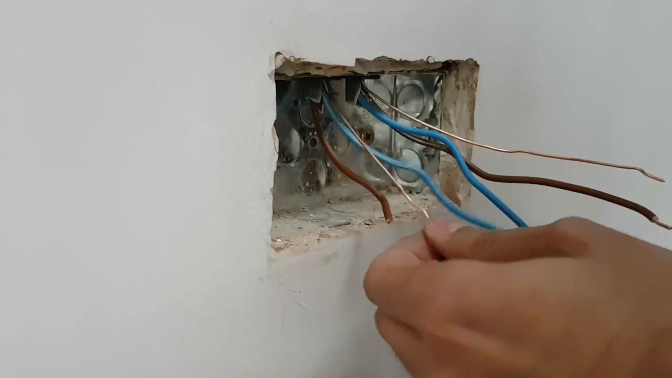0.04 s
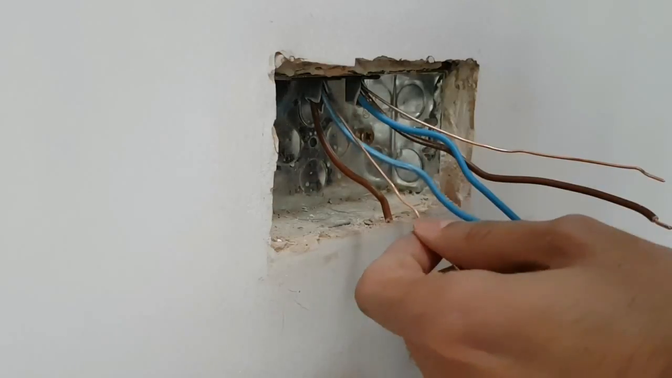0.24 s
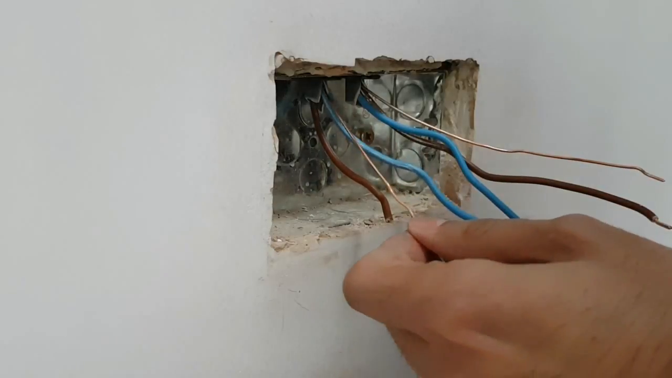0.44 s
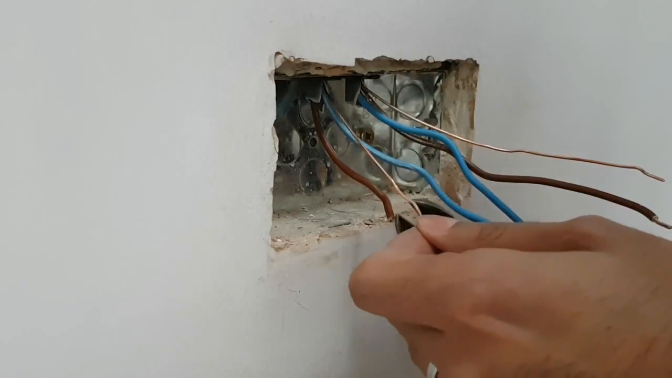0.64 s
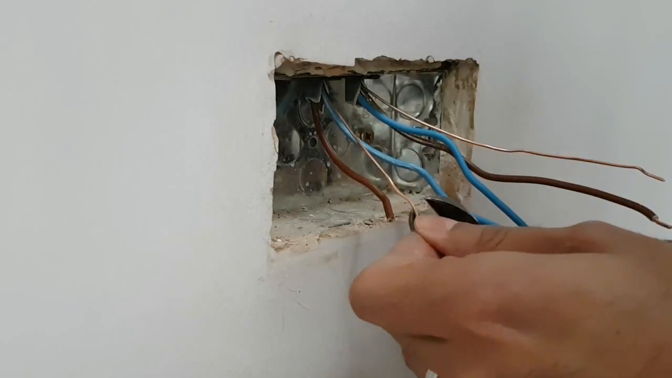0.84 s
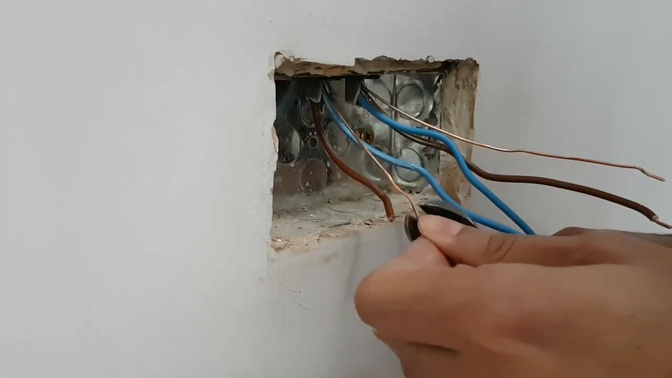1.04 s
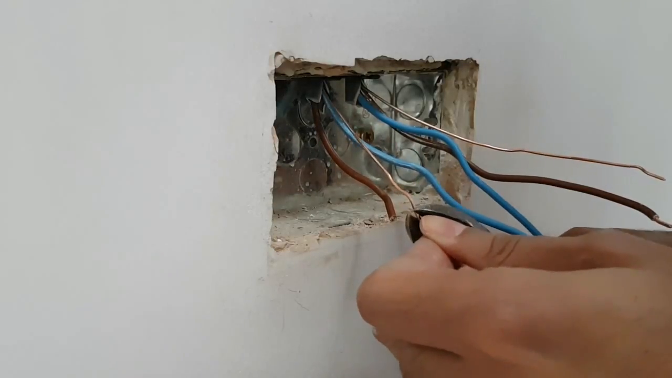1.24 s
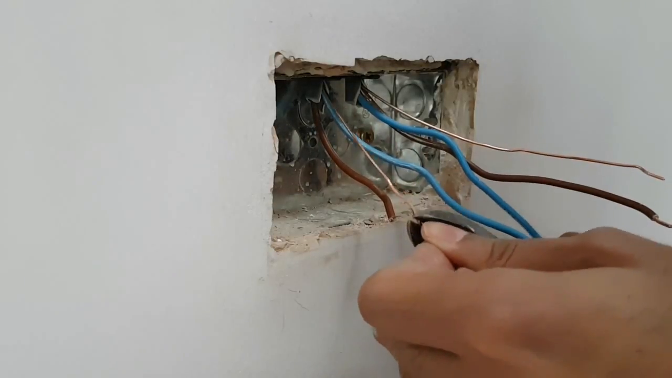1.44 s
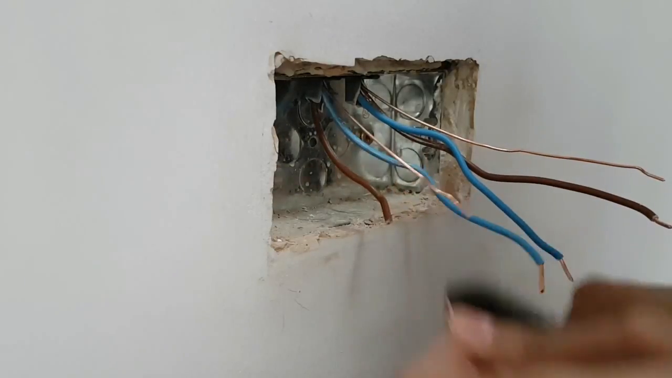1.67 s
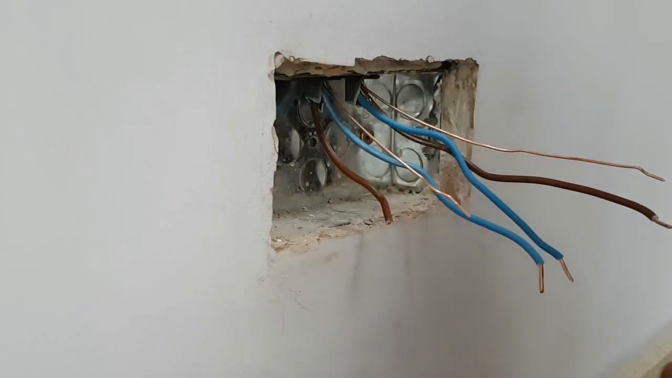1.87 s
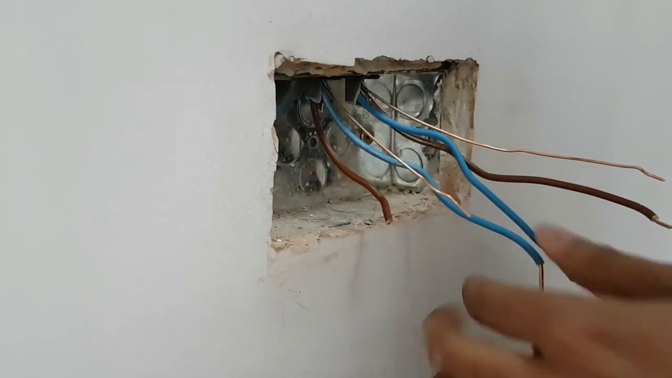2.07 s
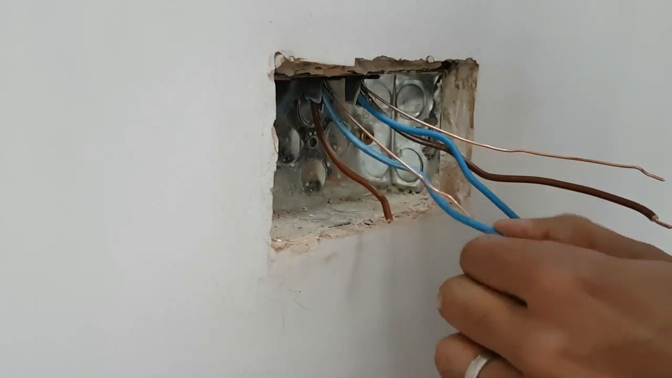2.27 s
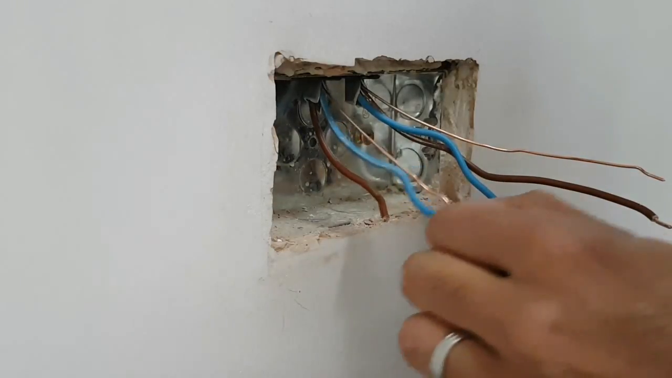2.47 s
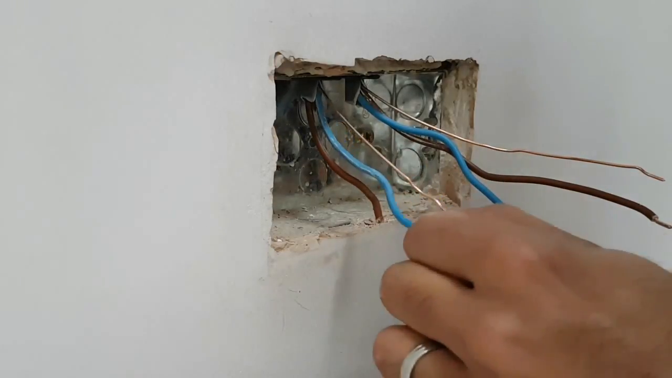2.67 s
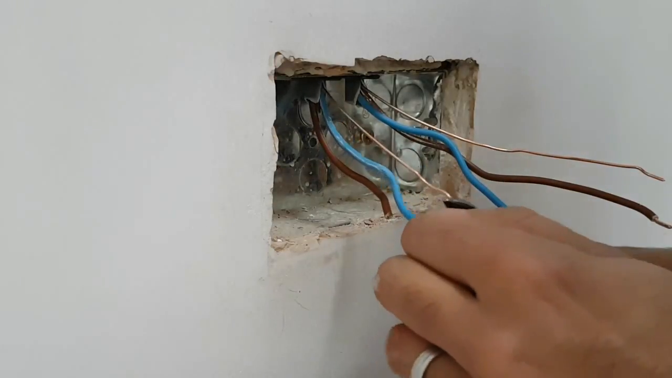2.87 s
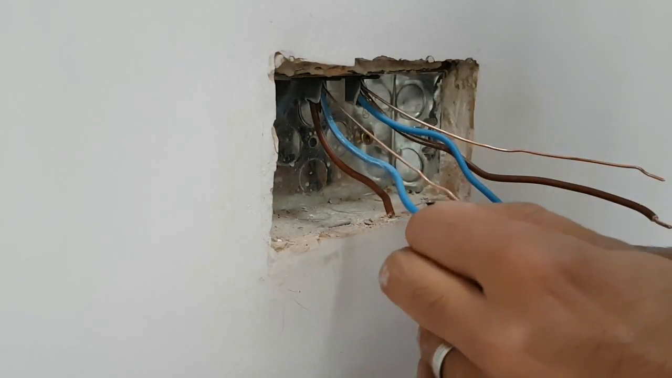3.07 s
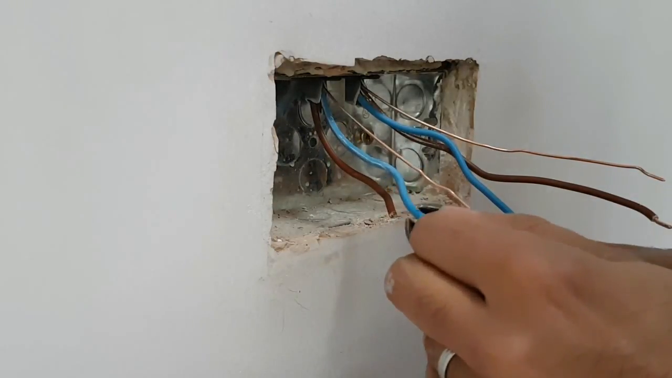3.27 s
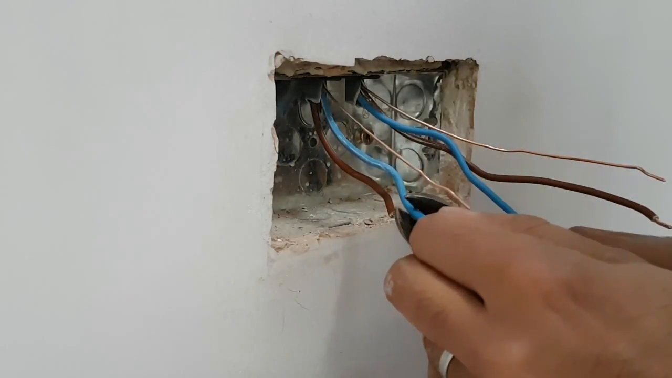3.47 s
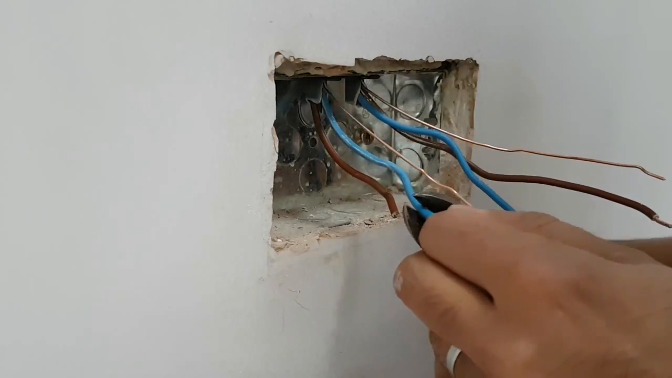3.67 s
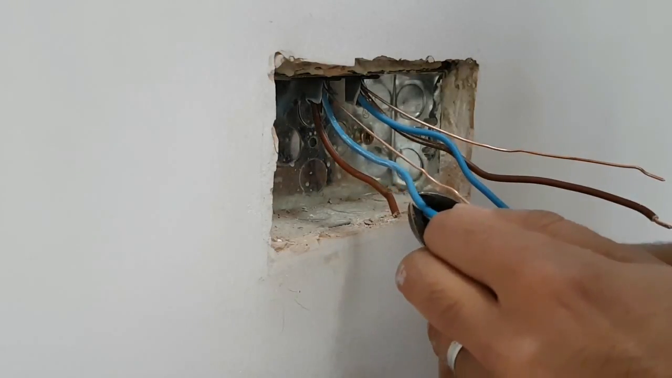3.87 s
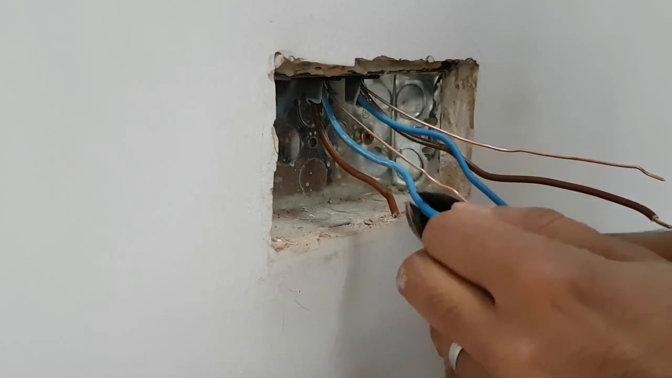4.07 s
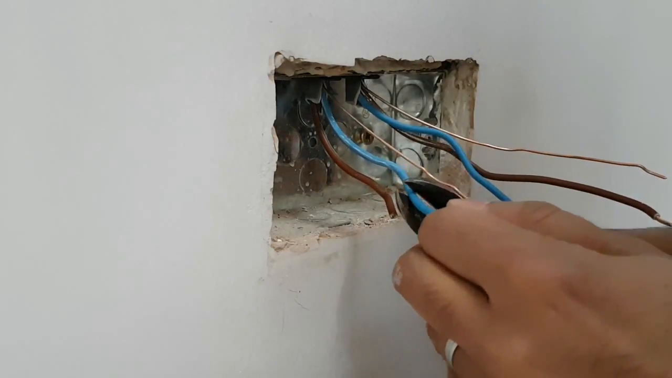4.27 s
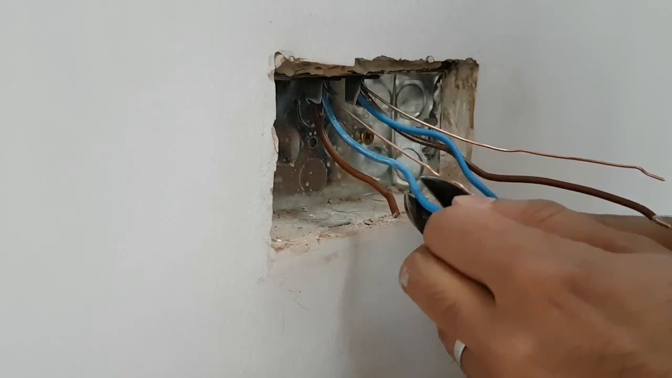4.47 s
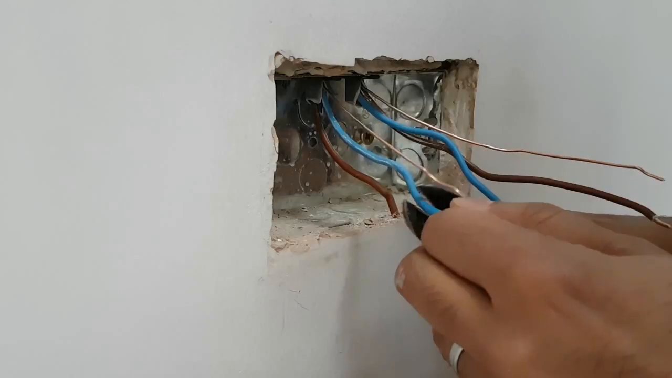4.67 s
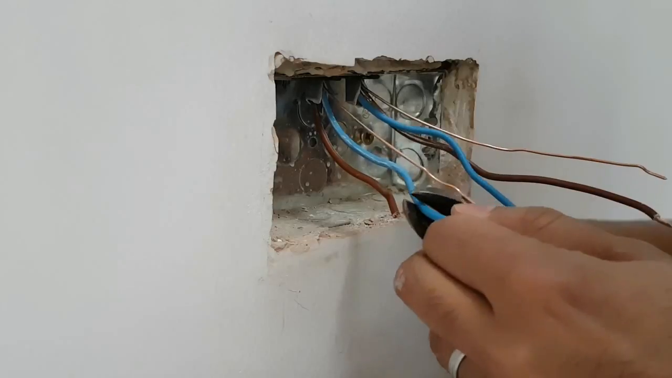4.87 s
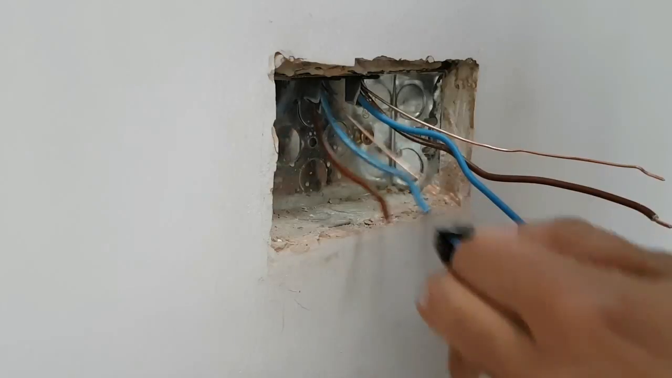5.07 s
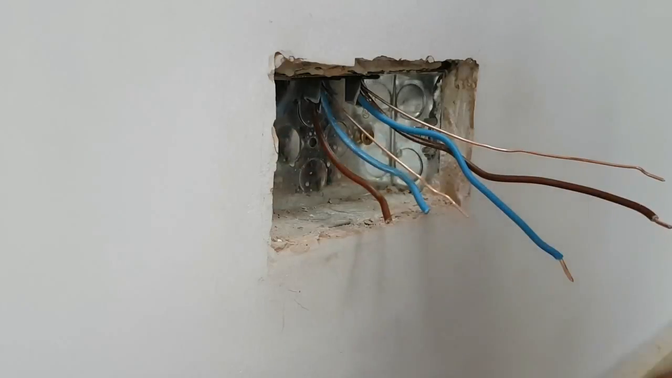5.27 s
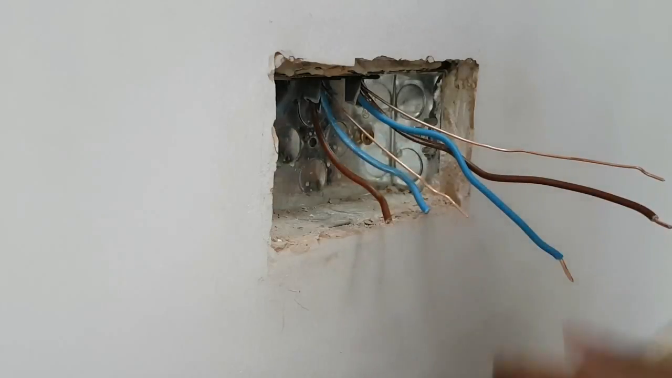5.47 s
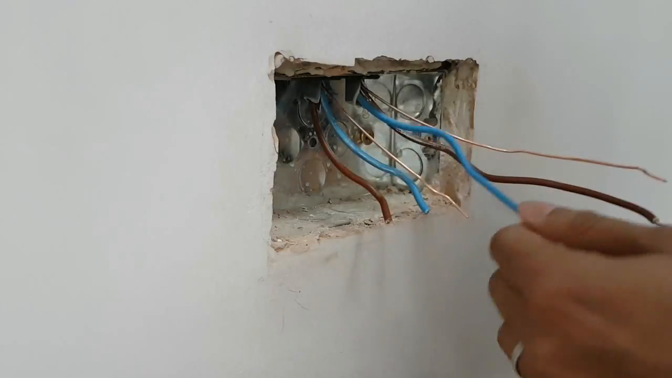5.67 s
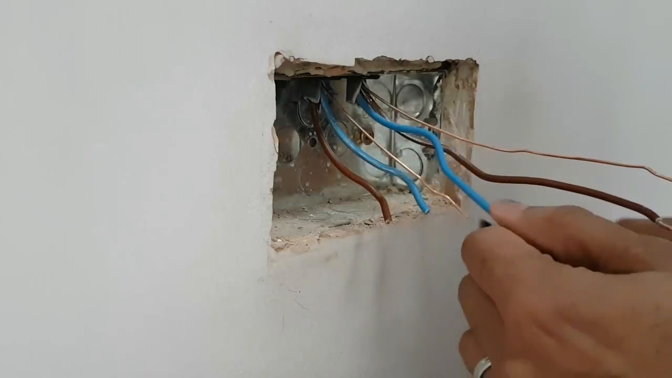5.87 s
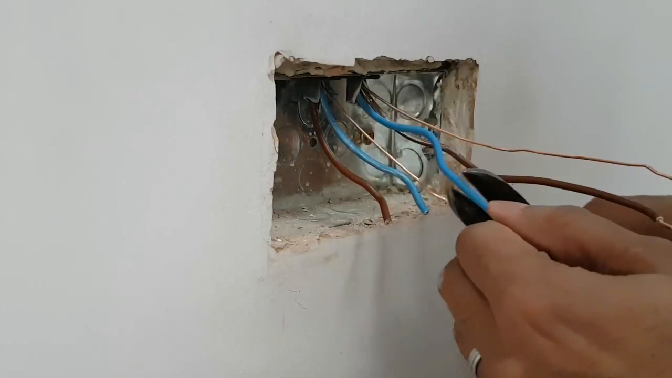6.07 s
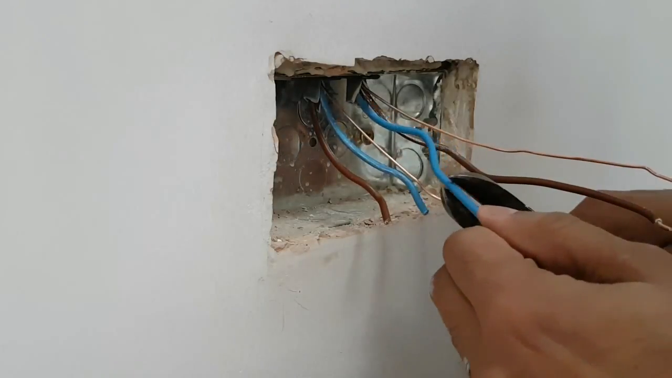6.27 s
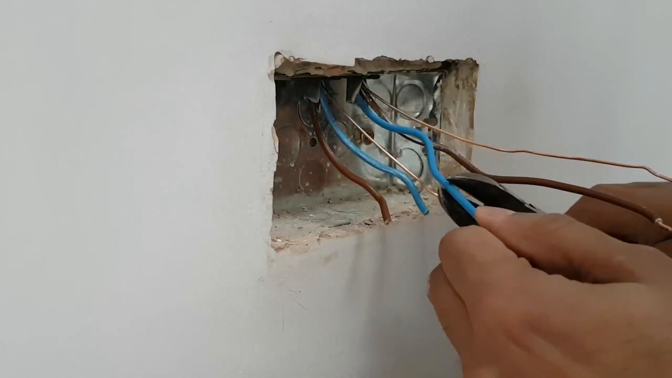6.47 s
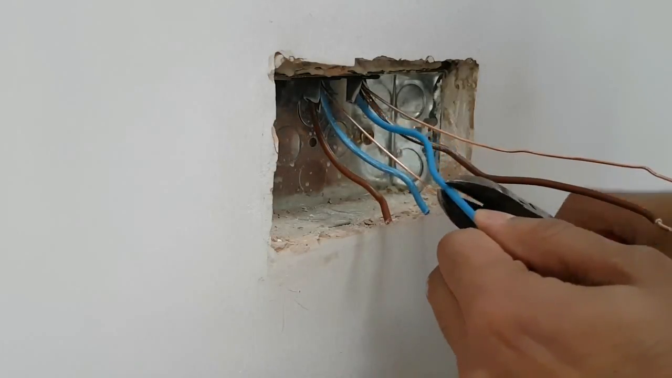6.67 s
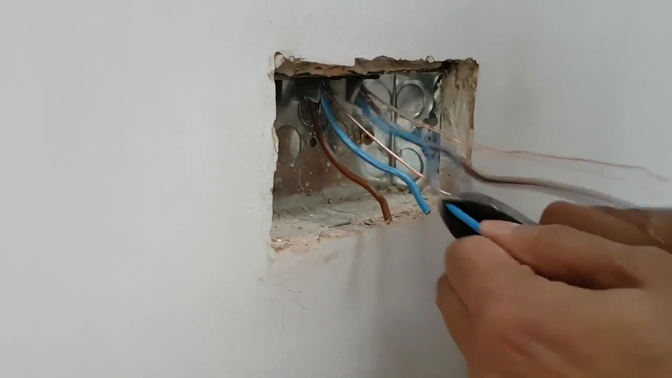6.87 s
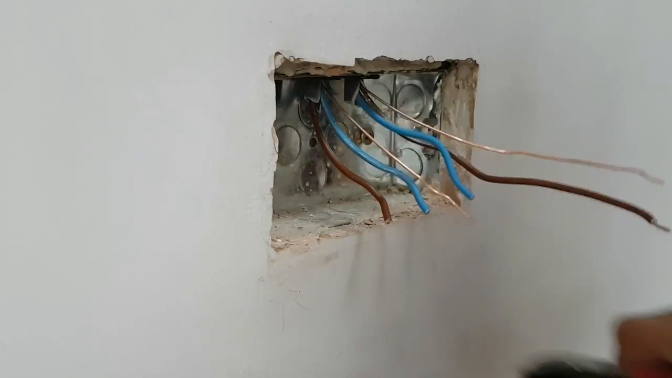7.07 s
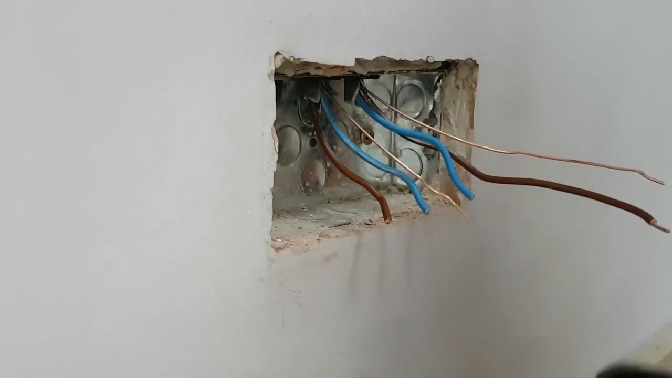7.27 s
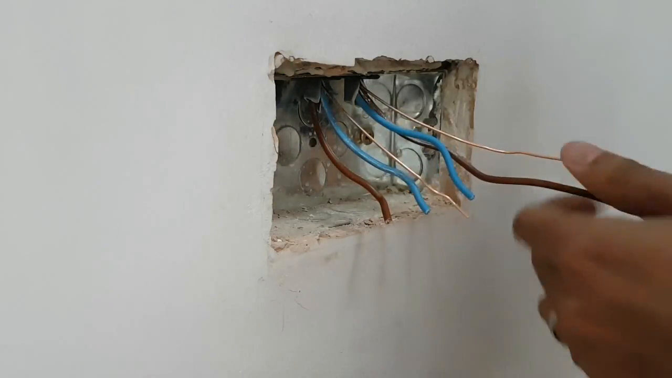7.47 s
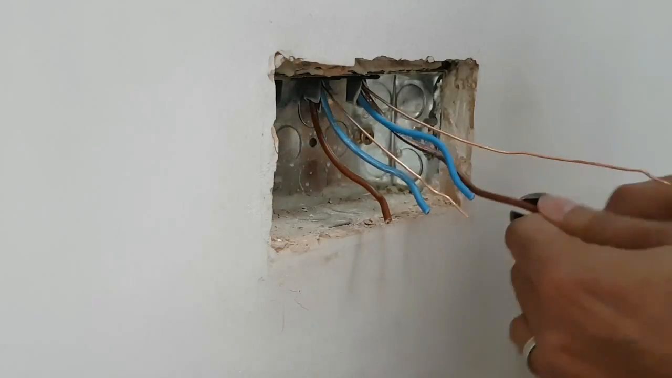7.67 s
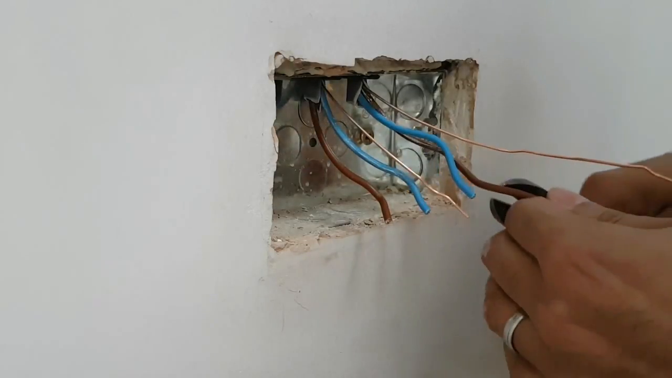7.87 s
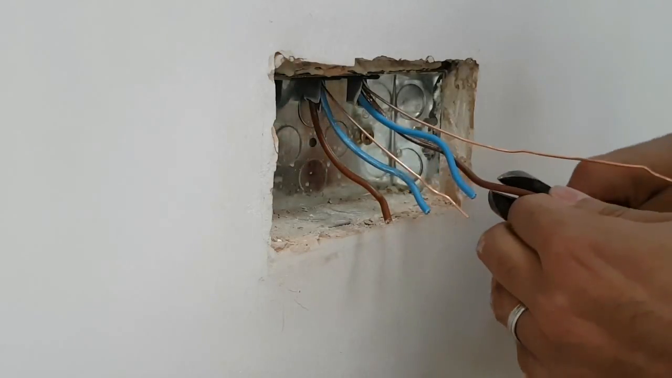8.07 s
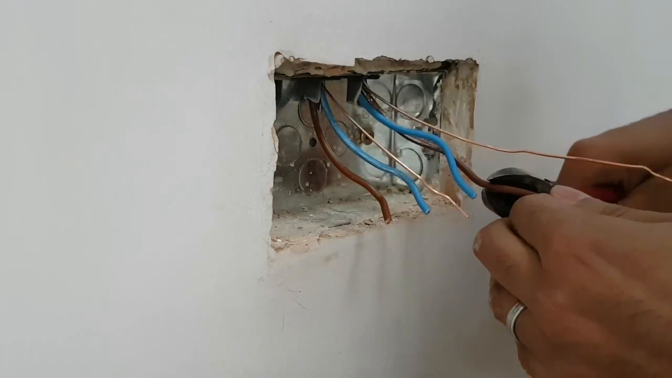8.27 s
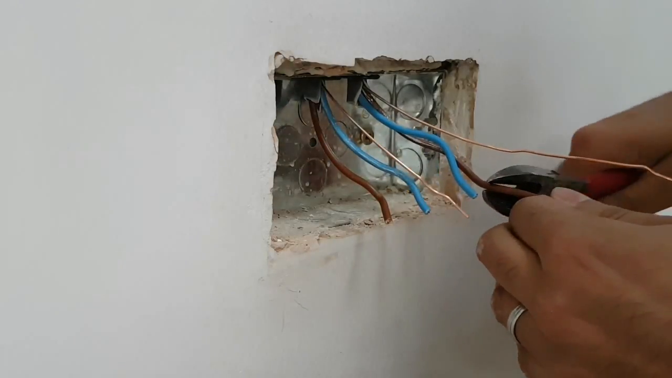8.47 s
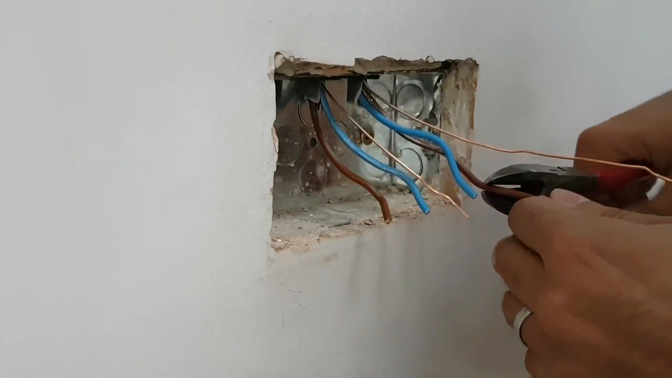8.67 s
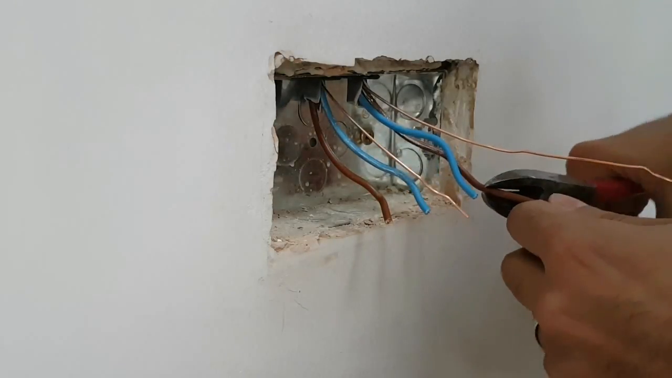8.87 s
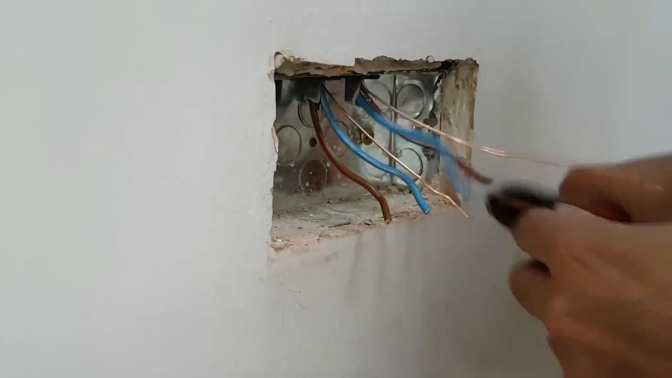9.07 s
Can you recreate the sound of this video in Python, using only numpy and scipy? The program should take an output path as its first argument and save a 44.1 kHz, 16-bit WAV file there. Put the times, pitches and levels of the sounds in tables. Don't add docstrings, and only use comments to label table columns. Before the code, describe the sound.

In a small bare room, close to a steel wall box, a light knock and a dull cable thud lead to small taps and a sharp cutter snap. A stiff offcut lands, bounces and rings thinly. Ticks, scrapes and creaks continue over a faint passing vehicle until a second, loudest snap that overloads the microphone. A softer offcut drops; a third snap follows, its offcut falls, then two knocks on the box. Hiss lies beneath.

```python
import sys
import numpy as np
from scipy import signal
from scipy.fft import rfft, irfft
from scipy.io import wavfile
from scipy.ndimage import uniform_filter1d

SR = 44100
rng = np.random.default_rng(int(sys.argv[2]) if len(sys.argv) > 2 else 0)


def decibels_to_gain(level_db):
    exponent = np.asarray(level_db, float) / 20
    return 10 ** exponent


def master(y):
    cut = np.clip(np.atleast_2d(y).T, -1, 1)
    pcm = np.round(cut * 32767)
    wavfile.write(sys.argv[1], SR, pcm.astype(np.int16))


N = 402633

# frequency in Hz, density in dB per Hz.
HISS_COLOUR = [(26, -28.5), (45, -3.5), (53, -16), (150, -8), (264, -10.5), (401, -7), (552, -9),
               (779, -11), (1020, -11.5), (2190, -14.5), (9110, -27), (14900, -22.5), (15550, -23.5),
               (15750, -60.5)]
# frequency in Hz, density in dB per Hz.
VEHICLE_COLOUR = [(15, -41.5), (25, -11), (59, -11), (118, 1), (162, -2.5), (212, -15), (299, -13),
                  (330, -13.5), (430, -45), (730, -120)]
# time in seconds, level in dB.
VEHICLE_PASS = [(0.0, -73), (0.4, -66), (0.8, -74.5), (1.7, -53), (2.2, -60), (2.5, -52), (3.0, -49),
                (3.8, -53.5), (4.8, -54.5), (5.3, -52), (5.7, -65), (6.1, -75.5), (6.7, -70.5), (7.1, -65),
                (7.5, -71), (8.1, -64), (9.1, -65)]
# frequency in Hz, shared power from 0 to 1.
LIKENESS = [(60, 0.71), (130, 0.6), (290, 0.4), (640, 0.12), (1410, 0), (3100, 0.1), (6820, 0), (15000, 0)]
# centre in seconds, peak in dB, length in seconds.
MODE_SWELLS = [
    (0.1, -70, 0.18),
    (0.716, -66, .12),
    (0.95, -70, .2),
    (1.87, -66.5, 0.11),
    (2.803, -67, 0.31),
    (3.15, -73, 0.11),
    (5.3, -70, 0.14),
    (7.214, -59.5, 0.092),
    (7.5, -61.5, 0.066),
]
# frequency in Hz, t60 in seconds.
ROOM_DECAY = [(120, 0.26), (500, 0.6), (1500, 0.48), (4000, 0.5), (8000, 0.46)]
# frequency in Hz, left minus right in dB.
ROOM_LEAN = [(500, -0.73), (1500, -1.5), (4000, -3), (8000, -3.5), (14000, 3.5)]

# start in seconds, length in seconds, level in dB.
CORE_CREAKS = [(1.328, .16, -72), (2.989, 0.073, -64), (3.778, 0.077, -63.5), (4.26, 0.038, -60),
               (4.376, 0.06, -71), (4.532, .05, -69), (4.606, 0.097, -66.5), (4.778, .04, -69),
               (4.824, .06, -58), (4.919, 0.022, -71), (5.083, 0.062, -65)]
# frequency in Hz, level in dB, t60 in seconds.
STEEL_BOX = [(880, -6.5, 0.04), (942, -1.5, 0.04), (950, -7, 0.03), (970, -8, 0.03)]
# start in seconds, strength in dB, grit over the hollow in dB.
TAPS = [(1.012, -51, -20), (1.334, -47.5, -2.5), (1.445, -45.5, -15), (1.352, -50, -10), (1.363, -54, -10),
        (1.462, -48, -16.5), (1.481, -54.5, -15.5), (1.622, -44.5, -13.5), (1.63, -33, -2),
        (1.645, -42, -10.5), (1.655, -46, -10.5), (2.971, -38, -1.5), (2.984, -41.5, 1), (3.108, -49.5, 0),
        (3.305, -40, -24), (4.284, -45.5, 0.5), (4.293, -43, -4.5), (4.304, -46, -9), (3.035, -52, 6),
        (3.093, -39.5, -2.5), (3.147, -46.5, -9.5), (3.189, -33, -8.5), (3.294, -44, -7), (3.462, -49, -38),
        (3.563, -41.5, -11), (3.786, -47.5, -3.5), (3.81, -55, -19), (3.842, -54, -16), (4.176, -47, -10),
        (4.27, -52, -12), (4.326, -41.5, -16), (4.393, -50, -16), (4.562, -53.5, -12), (4.618, -51.5, -13),
        (4.779, -51, -21.5), (4.823, -48.5, -10.5), (4.832, -50.5, -8), (4.841, -48, -6),
        (4.855, -44.5, -11.5), (4.866, -46, -8.5), (4.875, -48, -9.5), (4.896, -37, -3),
        (4.907, -44.5, -0.5), (4.942, -52, -6), (4.951, -54, -6), (5.1, -51.5, -10.5), (5.117, -50, -11.5),
        (5.138, -50, -14.5), (6.856, -46.5, -13.5), (3.199, -39, -10), (4.886, -39.5, -2),
        (5.085, -50.5, -10.5), (5.128, -45.5, -17.5), (6.315, -47.5, -5.5), (7.728, -51, -18.5),
        (8.458, -42, -25)]
# start in
# seconds, strength in dB, bright tick over the grit in dB, contact in ms.
SCUFFS = [(1.335, -49.5, -2.5, 7), (2.078, -53.5, 8.5, 3.7), (2.46, -49, -22, 11.4),
          (2.518, -47.5, -6.5, 14.3), (2.55, -50.5, -17, 42), (8.725, -47, -8, 7.3),
          (3.115, -63, 15, 5.9), (4.286, -44.5, -4, 18), (4.327, -49, -7, 3.3),
          (4.636, -48.5, -8.5, 6.7), (4.868, -49.5, -2, 10), (4.898, -50, -2.5, 3.8),
          (4.945, -50, -17.5, 15), (5.109, -65.5, 4.5, 26), (5.539, -56.5, 11, 5.3),
          (5.774, -53, -0.5, 12), (6.232, -46, -17, 14), (6.408, -49, -13.5, 11.7),
          (6.46, -51.5, -7, 10), (6.933, -52.5, -14, 8.7), (6.953, -53, -1, 7.6), (6.978, -42, -4, 18),
          (7.595, -43.5, -21.5, 15), (7.628, -49.5, 0.5, 11), (7.804, -55, 1, 13),
          (7.844, -60.5, 7.5, 11)]
# start in seconds, strength in dB, box hollow over the thud in dB.
CABLE_THUDS = [
    (0.716, -47, -7),
    (1.666, -45.5, -7),
    (5.984, -38, -14.5),
    (6.803, -65, -5),
    (6.843, -38.5, 2.5),
    (6.953, -47, -8),
    (7.628, -47.5, -5),
    (7.805, -63.5, -5),
]
# start in seconds, peak in dB, pitch in Hz, width in Hz, scrape in ms.
JAW_SINGS = [(1.44, -60.5, 2460, 300.6, 3.7), (1.629, -46.5, 2460, 400, 7), (4.285, -57, 3100, 400, 16),
             (3.096, -50, 2240, 250, 9), (4.64, -62.5, 4880, 900, 9.6), (4.896, -54, 5000, 600, 5.8),
             (6.985, -59.5, 8450, 603.4, 5.3), (2.972, -36.5, 2253, 60, 25), (3.104, -48, 2010, 200.5, 14),
             (3.8077, -60.5, 2350, 300, 8.6), (3.846, -67, 2249, 303.3, 8.2), (6.228, -49, 1460, 250, 12),
             (6.2447, -46.5, 2016, 218.3, 24), (6.2614, -50.5, 2160, 201, 30),
             (6.314, -54, 1870, 297, 12.5), (6.4592, -49, 2240, 250.4, 6.1), (6.466, -52, 2500, 150, 14),
             (6.485, -55.5, 2230, 150, 17), (6.797, -54.5, 2200, 347.3, 19),
             (6.9311, -54.5, 2100, 300, 4.8), (6.977, -47, 2650, 450, 6), (6.977, -39, 2210, 130, 13),
             (6.996, -48, 2194, 130, 12), (4.832, -57, 2000, 250, 12)]
# time in seconds, lag of the left capsule in ms.
JAW_LAG = [(3.0, -.04), (5.0, .06), (6.2, .35)]
# landing in seconds, peak in dB, low mode in dB, middle mode in dB.
OFFCUT_BOUNCES = [
    (2.3819, -42.5, 2, -12),
    (2.397, -48.5, -6, -10),
    (2.414, -61, -3, 0),
    (2.4511, -52.5, -11, 14),
    (2.5215, -44.5, -18, -5),
    (2.562, -60, 8, 5),
    (2.588, -57.5, -8, 0),
]
# frequency in Hz, level in dB, t60 in seconds.
OFFCUT_RING = [(5250, -8.5, 0.12), (10200, -18.5, 0.25), (11570, -9, 0.15)]

BLOW_TIMES = [.0454, 1.7138, 2.3060, 5.2088, 5.5933, 5.7143, 7.0677, 7.4108, 7.5820, 8.1325, 8.6783]
# peak in dB, crack length in ms, room share in dB, left minus right in dB.
BLOW_SHAPES = [(-42.5, 7, -19.5, 0), (-3.5, 4, -12, -1.5), (-17, 5.6, -16, 0.5), (0, 5.5, -12, -0.5),
               (-41.5, 83, -13.5, -1), (-48.5, 6, -4, -2.5), (-4.5, 4.9, -10, -1), (-29.5, 6.2, -7.5, 1),
               (-42.5, 6.5, -8.5, -8.5), (-46.5, 2.95, -14, 0), (-16, 8.6, -12.5, -2)]
# frequency in Hz, level over the crack in dB, t60 in seconds.
BLOW_RINGS = [
    [(1253, 5, 0.066), (2750, -2, 0.028), (7780, -19, 0.24)],
    [(1335, -15, 0.2), (3935, -18, .2), (298, -33, .2), (122.5, -28, 0.16)],
    [(3450, -1, 0.011), (971, -4.5, 0.08), (1700, -2, 0.025)],
    [(2357, -12.5, 0.11), (2230, -16.5, 0.09), (3755, -12, 0.15), (3834, -11.5, 0.09), (120, -23, 0.18),
     (301, -28.5, 0.19), (403, -28.5, 0.2)],
    [(500, -3, 0.32)],
    [(2410, -5, 0.063)],
    [(176, -37, 0.55), (8280, 2, 0.017), (861.7, -4, 0.019), (1335, -15.5, 0.15), (3680, -18, 0.25),
     (312, -24, 0.14)],
    [(600, -7, 0.11), (14250, -2, 0.027)],
    [(604, -8.5, 0.041)],
    [(900, 14, 0.051)],
    [(1030, 2.5, 0.11), (1062, 8.5, 0.032), (890, -3.5, 0.069), (1630, 1.5, 0.039), (2083, -4, 0.03)],
]
BLOW_LAGS = [0, 0, .2, 0, 0, 0, 0, .25, .25, 0, .25]
# frequency in Hz, density in dB per Hz.
THIN_SNAP = [(88, -43), (150, -17), (406, -12.5), (567, -18.5), (871, -16), (980, -13.5), (1340, -3),
             (1620, -9), (2200, -7.5), (3300, -13), (3850, -4.5), (4500, -12.5), (6000, -5), (12700, -12.5),
             (15300, -17), (16200, -49.5)]
THICK_SNAP = [(88, -43.5), (150, -15.5), (414, -17.5), (731, -18), (2020, -8.5), (2320, 0.5), (2760, -13.5),
              (3400, -11), (3770, -1.5), (4200, -14), (6270, -4.5), (14500, -15), (15500, -20),
              (16200, -50)]
LAST_SNAP = [(88, -46), (150, -19), (1040, -12.5), (1310, -5), (2100, -14), (2550, -4.5), (3040, -15.5),
             (3700, -0.5), (4410, -12.5), (6030, -5.5), (12200, -14), (15400, -20.5), (16200, -50)]
# frequency in Hz, density in dB per Hz.
STIFF_DROP = [(88, -54), (150, -25), (613, -0.5), (806, -5), (942, -3), (1690, -3), (2500, -10),
              (3200, -20), (4330, -34), (7930, -35.5), (14500, -67), (16000, -71)]
SOFT_DROP = [(88, -36), (150, -9), (494, -5.5), (3770, -15.5), (7780, -15), (10000, -31), (12200, -9.5),
             (16000, -26.5)]
SOFT_BOUNCE = [(180, -44), (300, 0.5), (1390, -8.5), (2400, -8), (15000, -20.5), (16000, -23.5)]
LAST_DROP = [(88, -54), (150, -25), (494, -1.5), (1020, -6), (1540, -8), (1660, -7.5), (2410, -7),
             (14000, -24.5), (16000, -57.5)]
LAST_BOUNCE = [(88, -34), (150, -26), (589, -2), (1190, -19), (2270, -15), (14300, -20.5), (16000, -39)]
# frequency in Hz, density in dB per Hz.
LIGHT_KNOCK = [(180, -58), (300, -9), (1030, -11), (1260, 6.5), (1720, -16.5), (4300, -10), (12300, -33),
               (16000, -37.5)]
HOLLOW_KNOCK = [(180, -48), (300, -7), (701, -3), (962, -5), (1410, -14.5), (16000, -73)]
HARD_KNOCK = [(88, -69), (150, -32.5), (578, -11), (775, -15), (1060, 1), (1310, -20.5), (1700, -22.5),
              (2050, -14.5), (2450, -33.5), (16000, -74.5)]
# start in seconds, left swing, right swing (full scale 1).
CAPSULE_SWINGS = [
    (1.715, .04, .15),
    (5.2114, 0.48, -.9),
    (7.0687, -.04, .15),
]


def curve(hz, table):
    f, v = np.transpose(table)
    return np.interp(np.log(np.maximum(hz, 1)), np.log(np.maximum(f, 1)), v)


def coloured(x, gain):
    n = x.shape[-1]
    return irfft(rfft(x) * gain(np.arange(n // 2 + 1) * SR / n), n)


def bandpass(x, lo_hz, hi_hz):
    return signal.sosfilt(signal.butter(2, [lo_hz, hi_hz], "bandpass", fs=SR, output="sos"), x)


def band_rms(x, lo_hz, hi_hz):
    return np.std(coloured(x.mean(axis=0), lambda f: (f > lo_hz) & (f < hi_hz)))


def peak_one(x):
    power = uniform_filter1d(x ** 2, size=176).mean(axis=0)
    return x / np.sqrt(power.max())


def pair(size, alike):
    shared, *own = rng.standard_normal((3, size))
    return np.sqrt(alike) * shared + np.sqrt(1 - alike) * np.array(own)


def burst(noise, ms):
    t_ms = np.arange(noise.shape[-1]) / SR * 1000
    return noise * np.exp(-(t_ms / ms) ** 3)


def ring(modes, size, rise_ms):
    t, out = np.arange(size) / SR, 0
    for hz, db, t60 in modes:
        phase = 2 * np.pi * rng.random() + 0.7 * rng.standard_normal((2, 1))
        out = out + decibels_to_gain(db - 60 * t / t60) * np.sin(2 * np.pi * hz * t + phase)
    push = np.minimum(t * 1000 / rise_ms, 1)
    return out * np.sin(np.pi / 2 * push) ** 2


def click(colour):
    cepstrum = irfft(np.log(decibels_to_gain(curve(np.linspace(0, SR / 2, 2049), colour))))
    cepstrum[1:2048] *= 2
    cepstrum[2049:] = 0
    return irfft(np.exp(rfft(cepstrum)))


def lagged(sound, lag_ms):
    return np.array([np.roll(sound[0], round(lag_ms * SR / 1000)), sound[1]])


def add(bus, s, sound):
    i = int(s * SR)
    n = min(sound.shape[-1], N - i)
    bus[..., i:i + n] += sound[..., :n]


def wide_noise(table):
    mid, side = rng.standard_normal((2, N + 1))
    alike = lambda f: np.clip(curve(f, LIKENESS), 0, 1)
    mid = coloured(mid, lambda f: decibels_to_gain(curve(f, table)) * np.sqrt(1 + alike(f)))
    side = coloured(side, lambda f: decibels_to_gain(curve(f, table)) * np.sqrt(1 - alike(f)))
    return np.array([mid + side, mid - side])[:, :N]


def capsule_hiss():
    t, ducked = np.arange(N) / SR, 0
    fall_s, hold_s, duck_db = 0.3, 0.58, -8
    for s, (peak_db, *_) in zip(BLOW_TIMES, BLOW_SHAPES):
        if peak_db > -8:
            since = t - s
            ducked = ducked + np.clip(since / fall_s, 0, 1) ** 2 * np.exp(-(since / hold_s) ** 4)
    hiss = wide_noise(HISS_COLOUR)
    return hiss / band_rms(hiss, 11000, 15500) * decibels_to_gain(-75 + duck_db * ducked)


def vehicle():
    rumble = coloured(wide_noise(VEHICLE_COLOUR), lambda f: 1 / (1 + (f / 300) ** 8))
    level_db = np.interp(np.arange(N) / SR, *np.transpose(VEHICLE_PASS)) - 2.5
    return rumble / band_rms(rumble, 60, 200) * decibels_to_gain(level_db)


def room_mode():
    t, mode_hz, width_hz = np.arange(N) / SR, 400, 40
    gain = decibels_to_gain(-79)
    for s, db, length_s in MODE_SWELLS:
        gain = gain + decibels_to_gain(db) * np.exp(-((t - s) / length_s) ** 2)
    hum = coloured(pair(size=N + 1, alike=0.7), lambda f: 1 / (1 + (2 * (f - mode_hz) / width_hz) ** 2))[:, :N]
    return hum / band_rms(hum, 360, 450) * gain * decibels_to_gain(0.5)


def room(send):
    gap_ms, rise_ms, early_ms = 5.8, 1.5, 17
    near_wall_db, early_db, patchy_db = -4, 5.5, 2
    t = np.arange(SR) / SR
    ms, echo = t * 1000, 0
    noise = coloured(rng.standard_normal((2, SR)), lambda f: 1 / (1 + (f / 15000) ** 40))
    for hz in 60 * np.sqrt(2) ** np.arange(17):
        octaves = lambda f: np.log2(np.maximum(f, 1) / hz)
        band = coloured(noise, lambda f: np.cos(np.pi * np.clip(octaves(f), -0.5, 0.5)) ** 2)
        side_db = curve(hz, ROOM_LEAN) * np.array([[0.5], [-0.5]])
        steps = np.repeat(rng.standard_normal(SR // 200 + 1), 200)[:SR]
        patches_db = patchy_db * uniform_filter1d(steps, size=200)
        air = 1 + (hz / 15000) ** 2
        echo = echo + band * decibels_to_gain(side_db + patches_db - 60 * t / curve(hz, ROOM_DECAY) * air)
    far = np.clip((ms - gap_ms) / rise_ms, 0, 1)
    early = decibels_to_gain(early_db) * np.exp(-(ms - gap_ms) / early_ms)
    echo = echo * (decibels_to_gain(near_wall_db) + far * (1 + early))
    echo = echo / np.sqrt(np.sum(echo[:, :SR // 20] ** 2) / 20)
    return signal.fftconvolve(send[None], echo, axes=1)[:, :N]


def hollow(x):
    return bandpass(x, 803, 1067)


def creaks():
    out, t = np.zeros((2, N)), np.arange(9000) / SR
    slips_hz, scatter_db = 254, 2.5
    for s, length_s, db in CORE_CREAKS:
        chance, size, grain = rng.random((3, 9000))
        slips = (chance < slips_hz / SR) * decibels_to_gain(-scatter_db * np.log(1 - size)) + 0.1 * (grain - 0.5)
        swell = np.sqrt(np.clip(4 * t / length_s * (1 - t / length_s), 0, 1))
        rub = hollow(hollow(slips * swell))
        add(out, s, decibels_to_gain(db) * rub / np.sqrt(np.sum(rub ** 2) / (length_s * SR)))
    return out


def contact(box_db, grit_db, tick_db, thud_db, ms):
    grains = decibels_to_gain(3 * rng.exponential(size=4000))
    touch = burst(pair(size=4000, alike=0.6) * grains, max(ms, 1))
    grit = peak_one(bandpass(touch, 1200, 3300))
    tick = peak_one(bandpass(touch, 3300, 9500))
    box = ring([(hz, db + box_db, t60) for hz, db, t60 in STEEL_BOX], size=4000, rise_ms=1)
    thud = ring([(450, thud_db - 2.5, 0.039)], size=4000, rise_ms=0.8)
    body = hollow(box) + thud
    shaken = peak_one(signal.fftconvolve(touch[:1], body, axes=1)[:, :4000]) * np.abs(body).max()
    return decibels_to_gain(-5.5) * shaken + decibels_to_gain(grit_db - 7) * grit + decibels_to_gain(tick_db - 8) * tick


def ticks(near, send):
    touches = []
    for s, db, sharp_db in TAPS:
        grit_db = db + sharp_db
        touches.append((s, db, grit_db, grit_db - 12.5, db - 22, 4.9))
    for s, db, crisp_db, ms in SCUFFS:
        touches.append((s, db - 14, db, db + crisp_db, db - 13.5, ms))
    for s, db, box_db in CABLE_THUDS:
        touches.append((s, db + box_db, db - 6, db - 20, db, 1.5))
    for s, *shares in touches:
        sound = contact(*shares)
        add(near, s, sound)
        add(send, s, decibels_to_gain(-17.5) * sound[0])


def sings(near, send):
    t_ms = np.arange(6000) / SR * 1000
    for s, db, hz, width_hz, ms in JAW_SINGS:
        b, a = signal.iirpeak(hz, hz / max(width_hz, 20), fs=SR)
        swell = np.minimum(t_ms / (0.33 * max(ms, 1)), 1)
        scrape = swell * burst(pair(size=6000, alike=1), max(ms, 1))
        chirp = signal.lfilter(b, a, signal.lfilter(b, a, scrape))
        sound = decibels_to_gain(db + 1) * peak_one(chirp)
        add(near, s, lagged(sound, np.interp(s, *np.transpose(JAW_LAG))))
        add(send, s, decibels_to_gain(-20) * sound[0])


def offcut(near, send):
    for s, db, low_db, middle_db in OFFCUT_BOUNCES:
        favour_db = (low_db, middle_db, 0)
        modes = [(hz, mode_db + more_db, t60) for (hz, mode_db, t60), more_db in zip(OFFCUT_RING, favour_db)]
        tap = peak_one(np.diff(burst(pair(size=14000, alike=0.33), 4.3), prepend=0))
        sound = decibels_to_gain(db - 6) * (decibels_to_gain(3.5) * ring(modes, size=14000, rise_ms=1.2) + tap)
        add(near, s, sound)
        add(send, s, decibels_to_gain(db - 12) * tap[0] + decibels_to_gain(-14) * sound[0])


def blows(near, send):
    colours = [LIGHT_KNOCK, THIN_SNAP, STIFF_DROP, THICK_SNAP, SOFT_DROP, SOFT_BOUNCE, LAST_SNAP, LAST_DROP,
               LAST_BOUNCE, HOLLOW_KNOCK, HARD_KNOCK]
    t_ms = np.arange(4097) / SR * 1000
    edge = 1 + decibels_to_gain(2.5) * np.exp(-t_ms / 0.8)
    for s, shape, colour, modes, lag_ms in zip(BLOW_TIMES, BLOW_SHAPES, colours, BLOW_RINGS, BLOW_LAGS):
        db, ms, room_db, pan_db = shape
        body = click(colour)
        noise = edge * burst(pair(size=4097, alike=0.45), ms)
        crack = peak_one(signal.fftconvolve(noise, body[None], axes=1))
        rings = ring(modes, size=8192, rise_ms=0.88)
        sound = np.pad(crack + rings, ((0, 0), (0, 32)))
        sides_db = np.array([[pan_db], [-pan_db]]) / 2
        add(near, s, lagged(sound, lag_ms) * decibels_to_gain(db + sides_db))
        even = body * np.sqrt(np.sum(crack[0] ** 2) / np.sum(body ** 2))
        add(send, s, decibels_to_gain(db + room_db) * even)
        add(send, s, decibels_to_gain(db + room_db - 11.5) * rings[0])


def scene():
    near, send = np.zeros((2, N)), np.zeros(N)
    for source in (ticks, sings, offcut, blows):
        source(near, send)
    return capsule_hiss() + vehicle() + room_mode() + room(send) + creaks() + near


def top_cut(x):
    return signal.sosfilt(signal.butter(12, 16180, fs=SR, output="sos"), x)


def record(dry):
    x = dry.copy()
    ms = np.arange(2000) / SR * 1000
    kick_ms, rebound_ms, hardness = 1.2, 4.1, 8
    kick = ms / kick_ms * np.exp(1 - ms / kick_ms)
    rebound = (ms / rebound_ms * np.exp(1 - ms / rebound_ms)) ** 4
    for s, left, right in CAPSULE_SWINGS:
        add(x, s, np.outer([left, right], kick - 0.82 * rebound))
    x = x / (1 + np.abs(x) ** hardness) ** (1 / hardness)
    x = signal.sosfilt(signal.butter(8, 17500, fs=SR, output="sos"), x)
    x = np.clip(x, -1, 1) - 0.0011
    return top_cut(x)


dry = scene()
out = record(dry)
master(out)
```